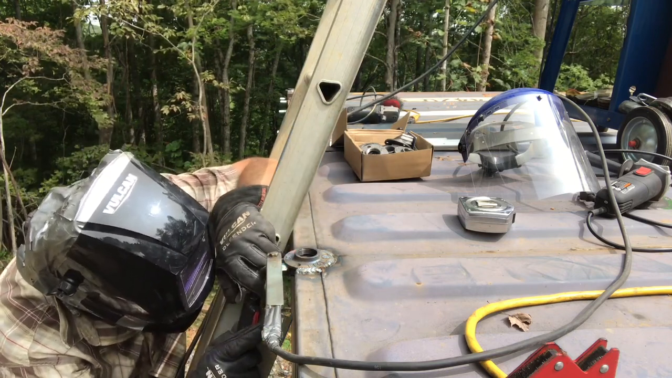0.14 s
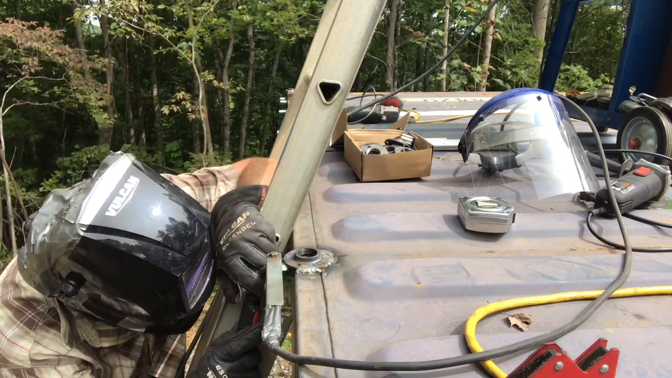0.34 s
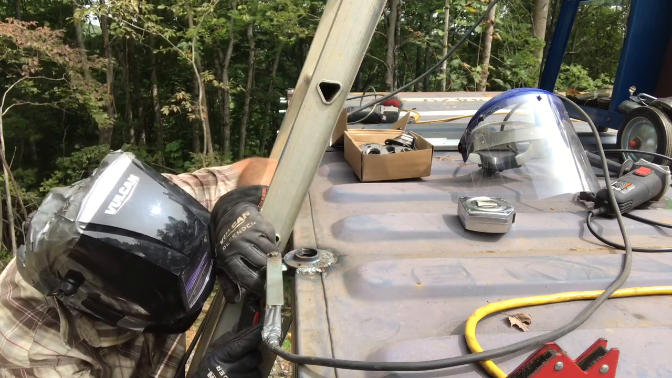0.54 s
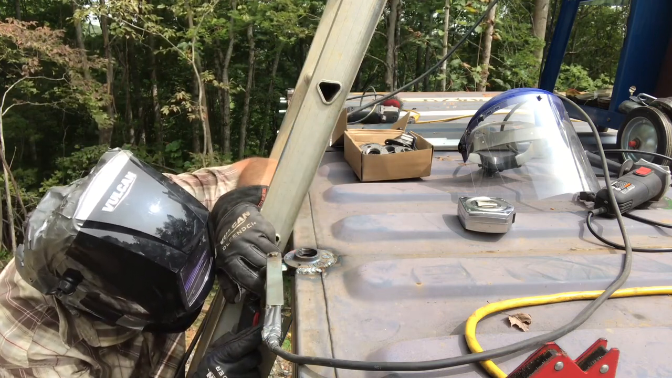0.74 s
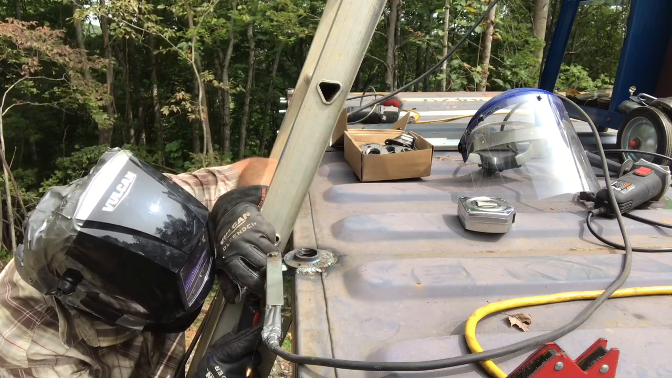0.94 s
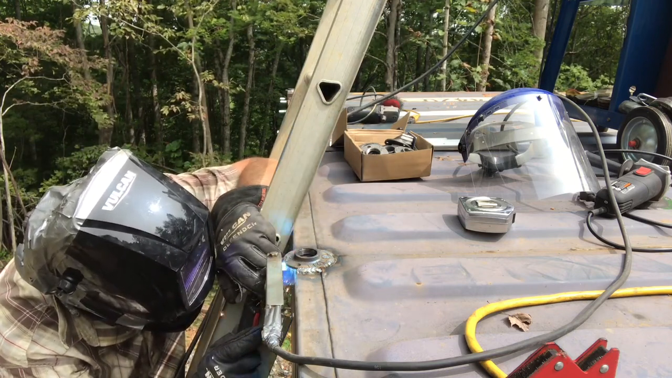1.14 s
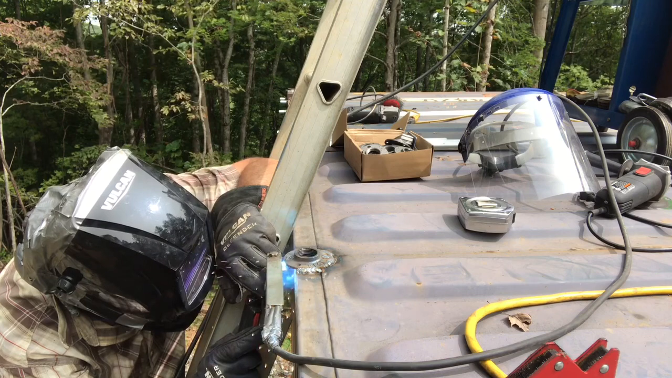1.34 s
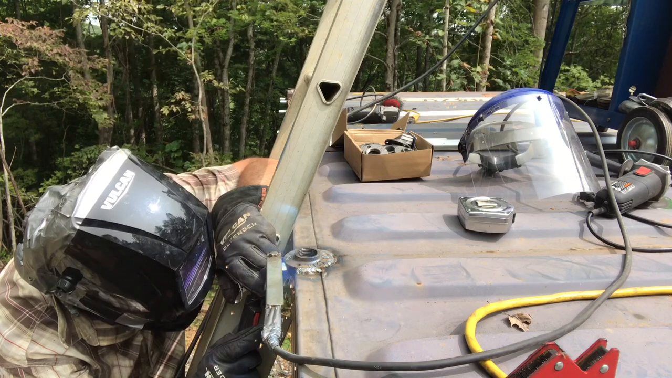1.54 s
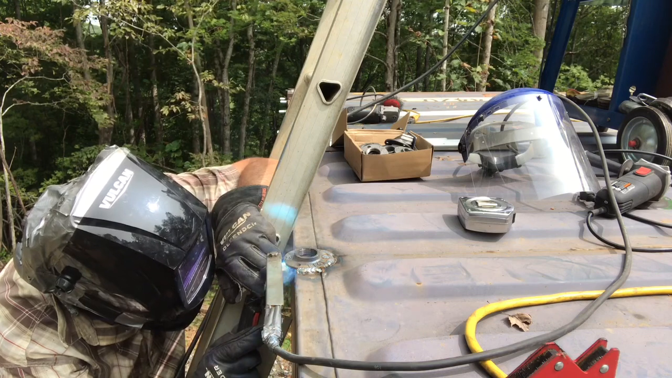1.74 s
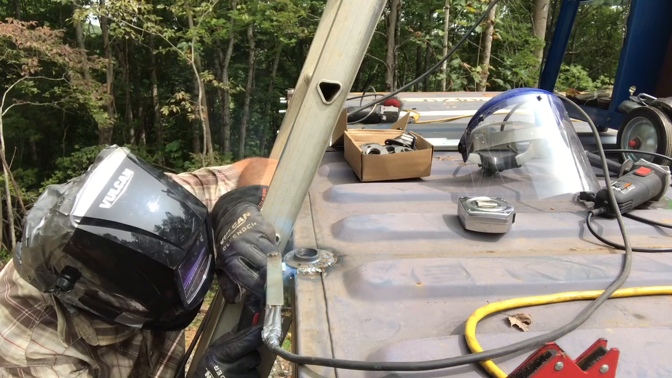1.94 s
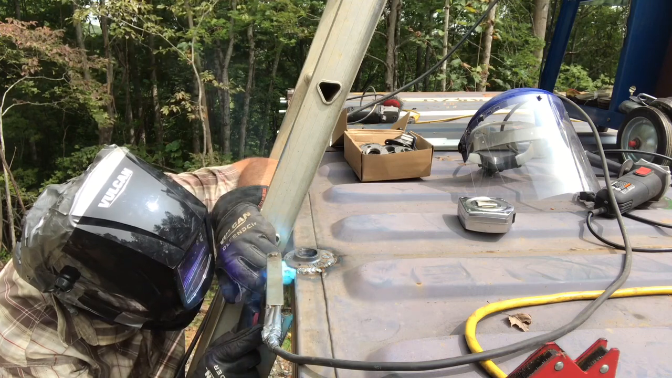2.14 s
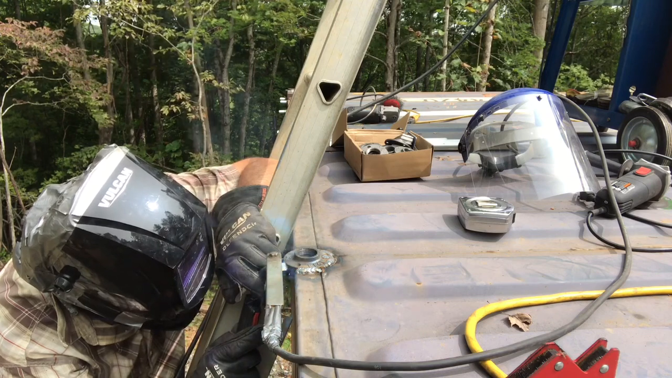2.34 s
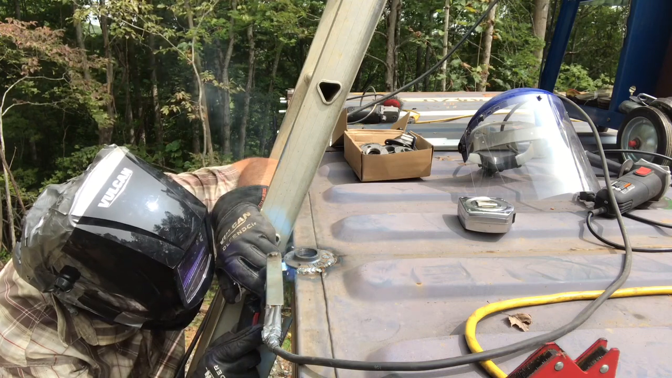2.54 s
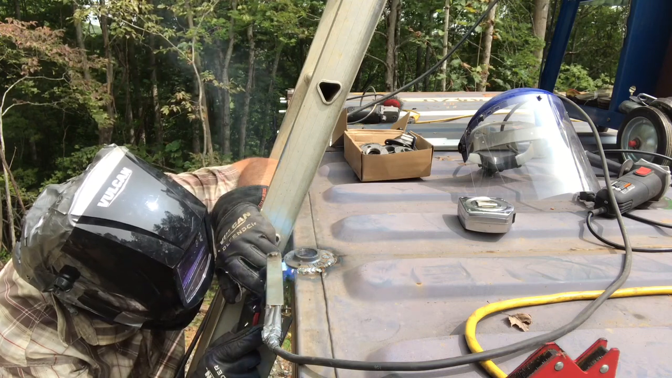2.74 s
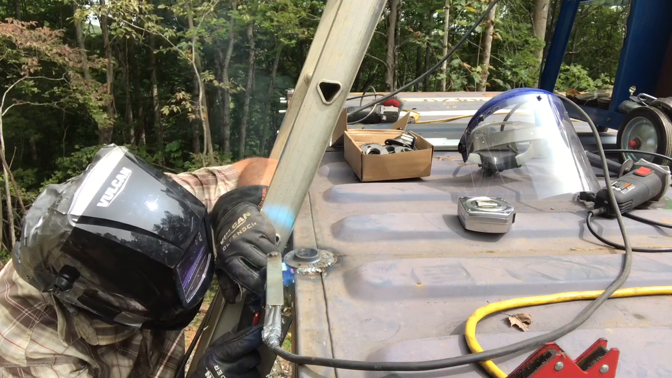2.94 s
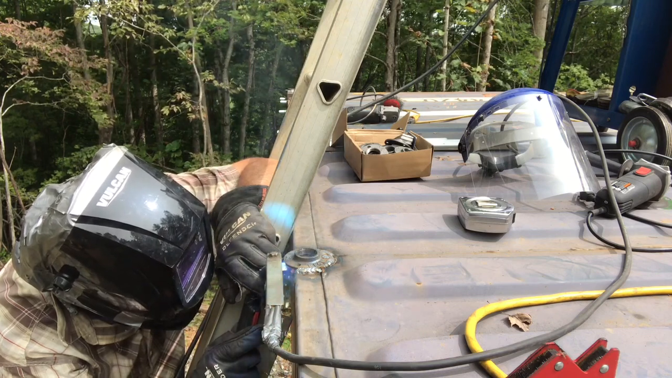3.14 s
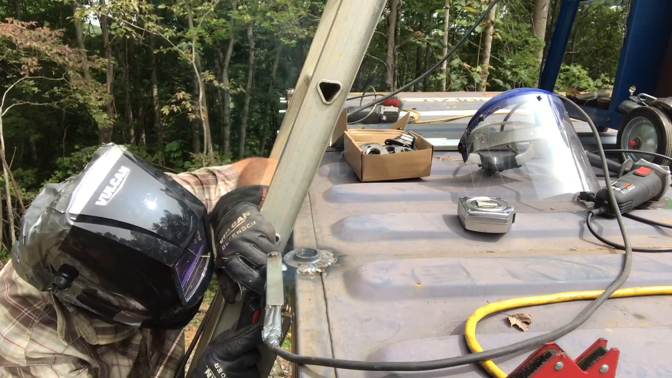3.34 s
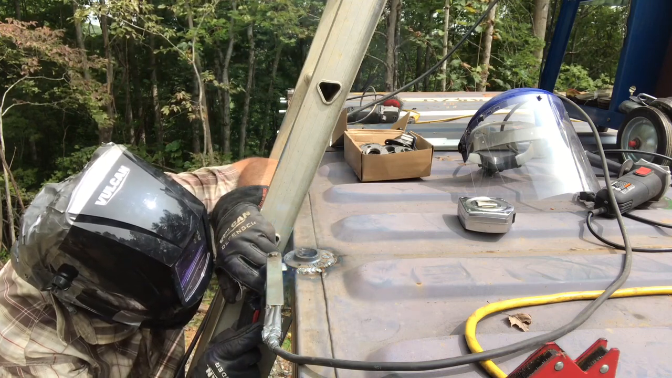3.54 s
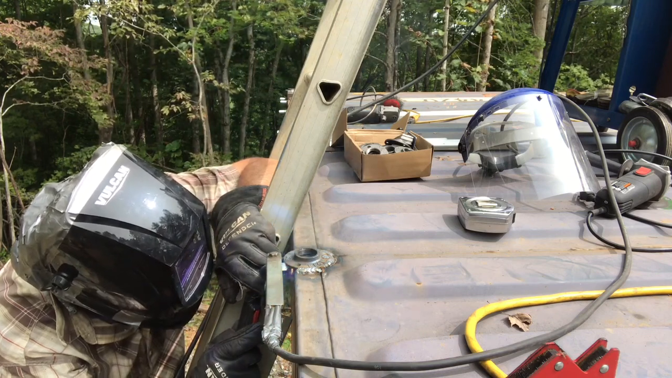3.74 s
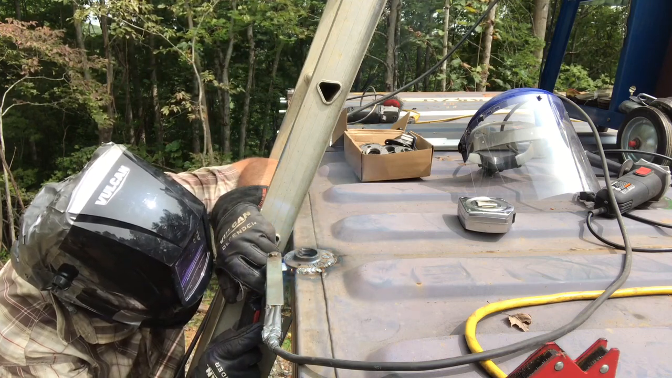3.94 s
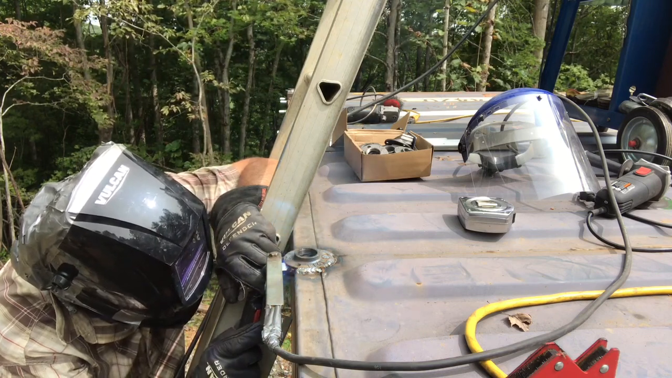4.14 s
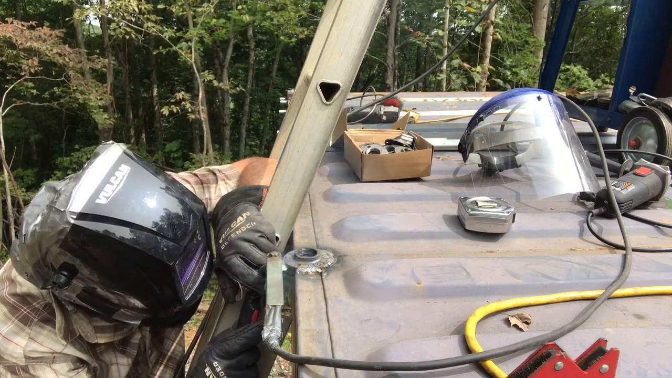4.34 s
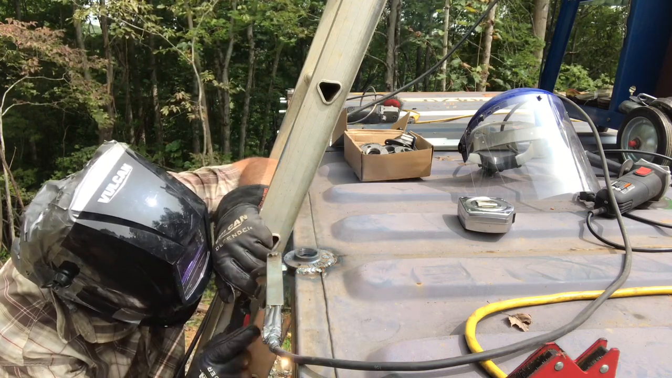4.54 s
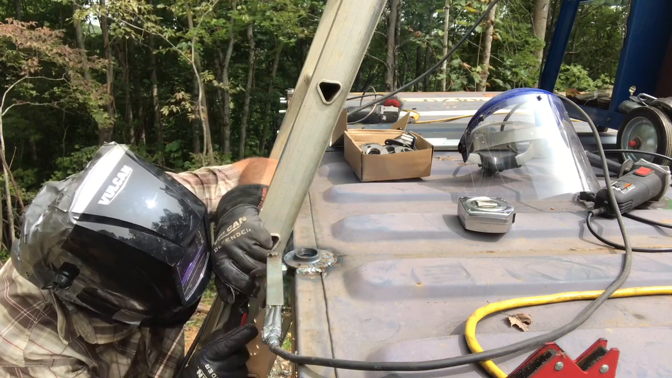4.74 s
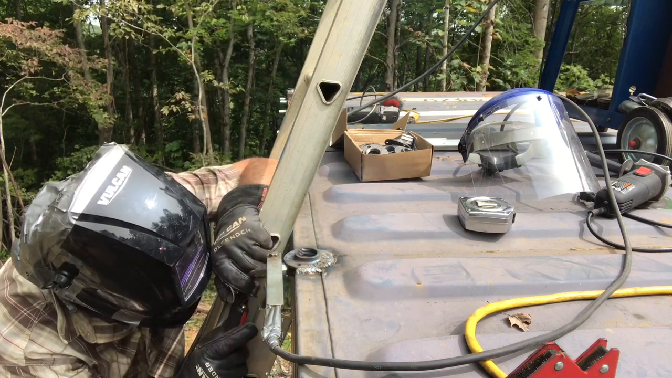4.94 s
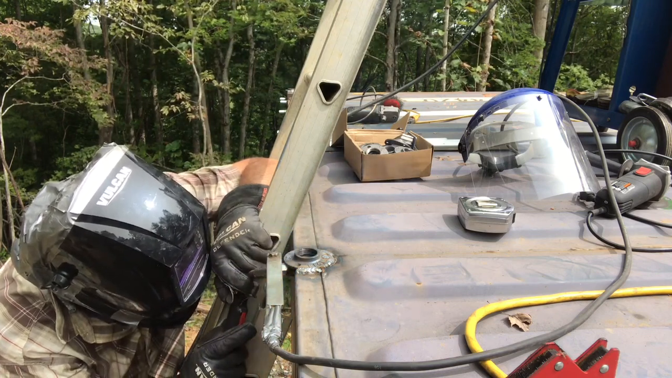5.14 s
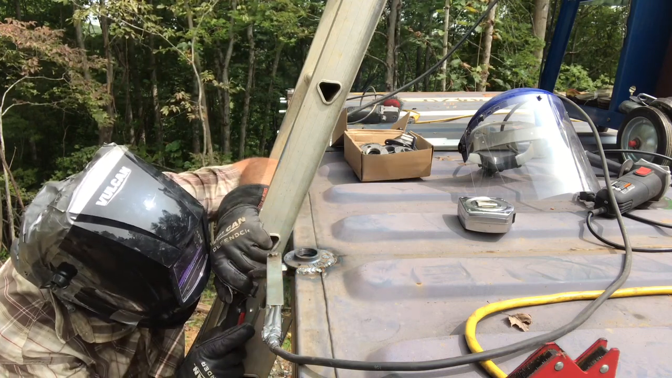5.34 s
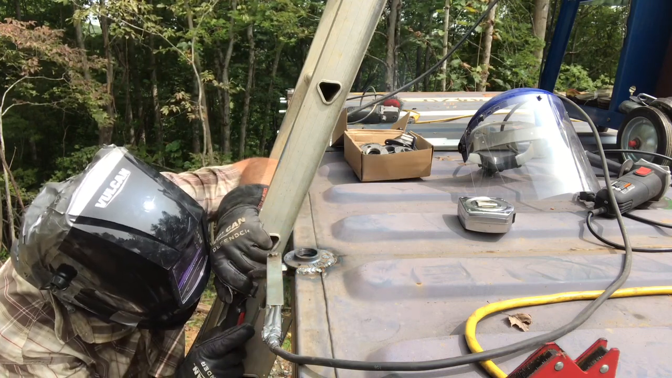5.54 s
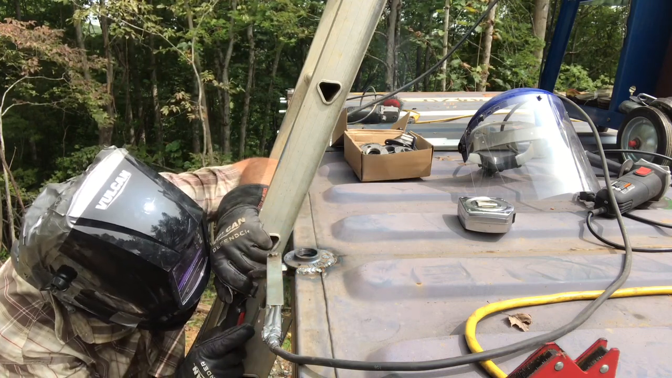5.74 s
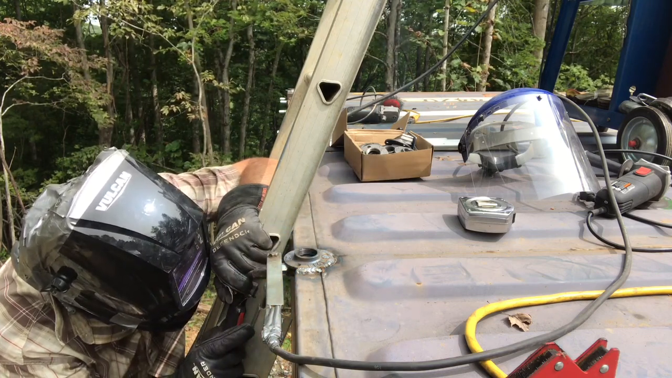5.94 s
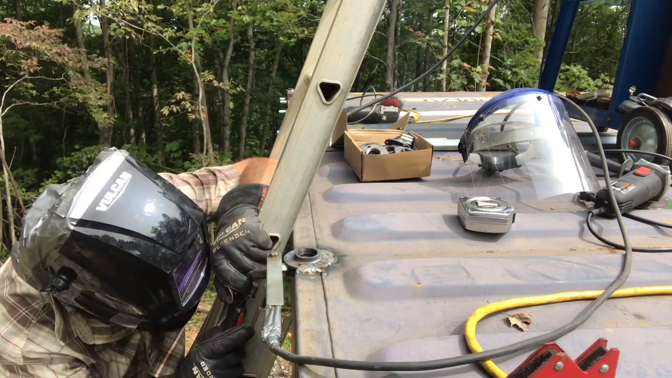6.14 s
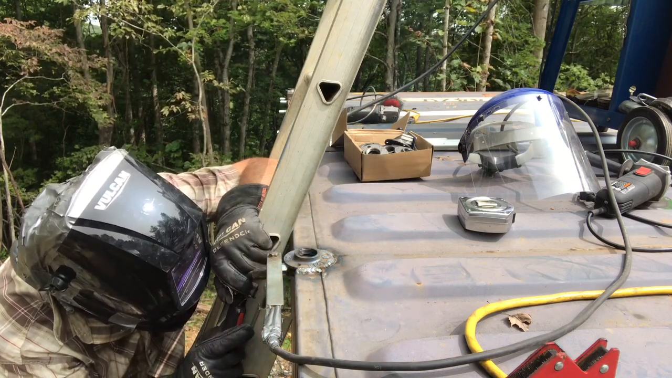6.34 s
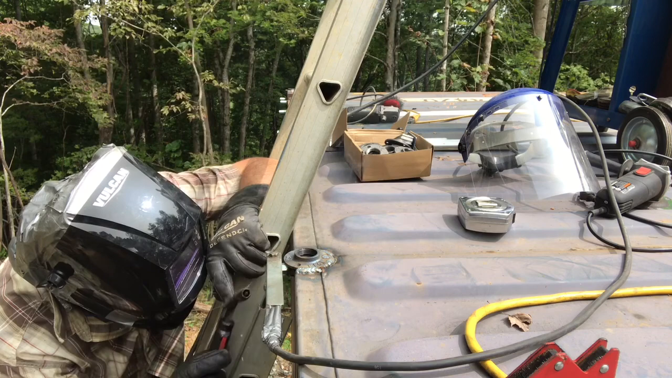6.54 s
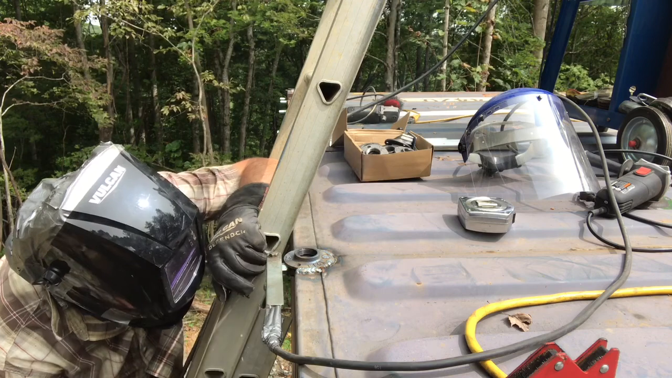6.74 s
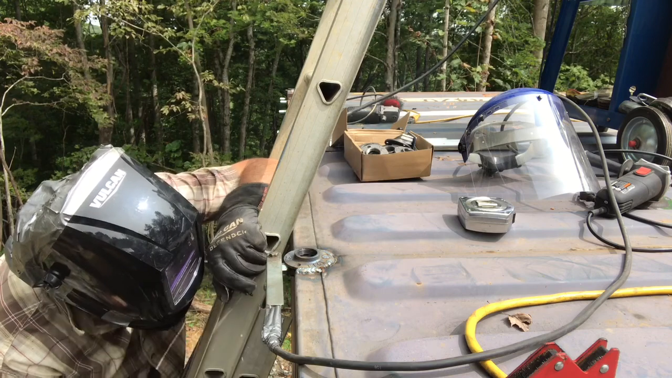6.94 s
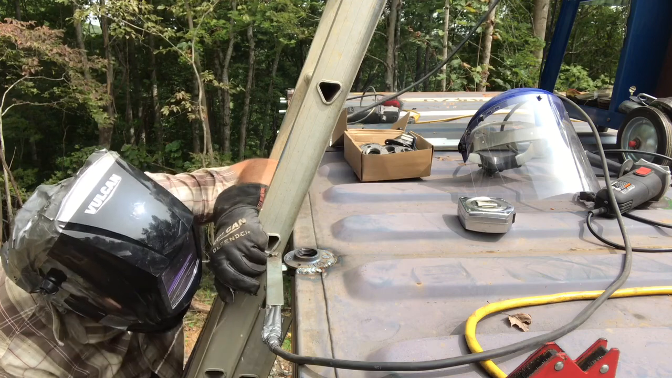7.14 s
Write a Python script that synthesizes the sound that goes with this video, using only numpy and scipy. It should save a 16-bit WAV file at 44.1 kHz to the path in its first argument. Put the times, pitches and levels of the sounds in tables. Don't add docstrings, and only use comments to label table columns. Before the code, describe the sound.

Close, dry welding crackle outdoors: clusters of hard bright pops ring on steel, with thin hiss and sputter between them, over a generator's steady drone further back. The bursts come between about one and three and a half seconds, gas hissing on a little longer. Afterwards there is mostly drone and whirr, broken by torch knocks and a faint sleeve rustle. The image is narrow and central.

```python
import sys
import numpy as np
from scipy import signal
from scipy.io import wavfile

SR = 44100
rng = np.random.default_rng(int(sys.argv[2]) if len(sys.argv) > 2 else 0)


def volts_from_db(level):
    exponent = np.asarray(level, float) / 20
    return 10 ** exponent


def wav_record(signal):
    frames = np.transpose(np.atleast_2d(signal))
    bounded = np.clip(frames, -1, 1)
    quanta = np.round(bounded * 32767).astype(np.int16)
    wavfile.write(sys.argv[1], SR, quanta)


N = 321924

# first pop in seconds, last pop in seconds, number of pops, gap ratio.
DRIP_RUNS = [(1.0772, 1.1012, 4, .95), (1.1179, 1.177, 6, 1.03), (1.2062, 1.2545, 4, 1),
             (1.294, 1.3531, 4, .95), (1.3772, 1.5054, 8, 1.01), (1.5265, 1.5861, 4, .95),
             (2.1806, 2.241, 6, 1.03), (2.2635, 2.3675, 6, 1.07), (2.67, 2.799, 7, 1.16),
             (2.829, 2.9452, 5, 1), (3.0037, 3.06, 3, 1.09), (3.1105, 3.3151, 8, .99)]
# level in dB, brightness in dB.
RUN_ARC = [(-13, 6.5), (-11, 0.5), (-8.5, -2.5), (-11.5, 2), (-11, -2), (-10, -2.5), (-14.5, 8), (-17, 15),
           (-10.5, -1), (-11, -7.5), (-10, -3), (-10, -2)]
# time in seconds, level in dB, brightness in dB.
STRAY_POPS = [(0.8512, -12.5, 0), (0.979, -7.5, -6), (1.3644, -20.5, 7), (1.5529, -22, -9), (1.7551, -5, 3),
              (1.761, -16.5, 0), (1.7708, -24.5, 12), (1.805, -25, -3), (1.8216, -17.5, 17),
              (1.834, -15, 16.5), (1.8487, -39, 15), (2.0196, -28.5, -4), (2.1132, -21, 5),
              (2.1238, -10.5, -3), (2.384, -29, 17), (2.423, -12.5, 9), (2.4449, -11.5, 1.5),
              (2.4536, -14, 9), (2.4839, -17, 15), (2.489, -15.5, 15), (2.5166, -18, 17.5),
              (2.5237, -18, 13), (2.6363, -14, 12), (2.9691, -11.5, -12.5), (2.979, -11.5, 1),
              (3.0837, -10.5, -7), (3.2111, -11.5, -10), (3.2514, -33, 10), (3.3067, -20, -6),
              (3.496, -18, 14)]
POP_SPREAD_DB, BRIGHT_SPREAD_DB = 1.2, 3.0
POP_SIDE_DB, POP_SIDE_HZ = -40, 4300
CLOSE_FACES = [(.27, .86), (1.02, -.5)]
OPEN_AFTER_MS, ESCAPE_DB = 2.6, -12
# centre in Hz, width in Hz, gain in dB.
STEEL_CORNER = [(2350, 600, 3), (3050, 450, -16), (4000, 200, -10), (4350, 250, -8), (3450, 400, -4),
                (4800, 650, 7), (5800, 450, 10), (6450, 380, -14), (7080, 200, -11), (7420, 350, 8),
                (8000, 300, 2), (8270, 250, -12), (9500, 800, -8), (10500, 450, -14), (10900, 300, 4),
                (11200, 200, -12), (11550, 500, 6), (11950, 450, -15), (12800, 250, -6), (13300, 250, -10),
                (13780, 250, -16), (14050, 300, 4), (14370, 200, -10), (14700, 500, 4), (15400, 250, -5)]
# delay in ms, level in dB, treble cut in Hz.
ECHOES = [(4.1, -19, 2700), (7.0, -25.5, 19000), (16.6, -31, 21000)]
# centre in Hz, width in Hz, gain in dB.
HOLLOW_BEAM = [(606, 89, 9.5), (787, 223, -15.5), (1258, 135, -32), (1606, 504, 10), (1966, 520, -56)]

# on in seconds, off in seconds, first level in dB, last level in dB.
VALVE = [
    (.645, 2.0, -51.5, -53),
    (2.02, 4.378, -62, -48.5),
]
# on in seconds, off in seconds, first level in dB, last level in dB.
BURNS = [
    (1.048, 1.6, -43, -65),
    (1.71, 1.89, -42, -47),
    (2.021, 2.124, -43, -46),
    (2.166, 2.398, -29, -47),
    (2.385, 3.32, -43, -43),
    (3.67, 3.85, -51, -55),
]
HISS_RISE_S, HISS_FALL_S = 0.015, 0.04
# frequency in Hz, level in dB per Hz.
GAS_COLOUR = [(1500, -32), (3000, 0), (5800, -0.5), (7500, -3), (10000, -6), (13000, -5), (16000, -5)]
# centre in Hz, width in Hz, gain in dB.
NOZZLE = [(5850, 450, 11), (6800, 350, 7), (8600, 400, 5), (9900, 400, 9), (11500, 400, 8), (14200, 600, 8),
          (15200, 400, 6)]
# on in seconds, off in seconds, first level in dB, last level in dB.
SPUTTERS = [(.86, .9, -56, -52), (1.01, 1.02, -48, -46), (1.045, 1.075, -44, -44), (1.718, 1.75, -33, -50),
            (1.875, 1.89, -42, -44.5), (2.025, 2.075, -42, -42), (2.11, 2.14, -36, -39),
            (2.165, 2.4, -40, -50), (2.54, 2.62, -44, -49), (3.68, 3.72, -50, -50),
            (4.222, 4.252, -33, -32.5)]
SPUTTER_RISE_S, SPUTTER_FALL_S = 0.011, 0.031

# time in seconds, peak in dB, pitch in Hz, t60 in seconds, tick level in dB, tick low cut in Hz.
KNOCKS = [
    (.627, -55, 2000, .025, -34, 6500),
    (4.645, -36, 560, .05, -21, 450),
    (4.645, -38, 1500, .03, -44, 8000),
    (5.0, -60, 900, .02, -46, 6000),
    (5.8, -60, 2000, .02, -42, 5000),
    (6.772, -36, 430, .06, -70, 5000),
]
# time in seconds, level in dB.
RUSTLE = [
    (6.5, -85),
    (6.54, -59),
    (6.8, -59),
    (6.95, -72),
    (7.0, -85),
]

# time in seconds, turns per second in Hz, effort in dB.
ENGINE = [(0, 31.58, 1), (.75, 31.76, 1), (1, 30.96, 0.5), (1.63, 30.92, 0), (1.95, 31.54, -1),
          (2.34, 31.27, -1), (2.6, 31, -0.5), (3.3, 31.43, -0.5), (3.6, 31.1, 2), (4.2, 31.4, 2),
          (4.65, 32.05, 1), (5.5, 31.55, 1.5), (7.3, 31.72, 1.5)]
# multiple of the turning speed, level in dB.
EXHAUST_ORDERS = [(1, -66), (2, -39.5), (3, -56.5), (4, -50), (5, -60), (7, -48.5), (10, -60), (11, -60.5),
                  (17, -59), (21, -64), (22, -63), (25, -72.5), (34, -64), (40, -61.5), (48, -61.5),
                  (68, -63)]
# pitch in Hz, level in dB, on in seconds, off in seconds.
MOTOR_TONES = [
    (49.3, -51, -1, .62),
    (98.4, -54, -1, .62),
    (73.5, -48, .62, 5.45),
    (49.3, -49, 5.5, 8),
    (98.4, -53, 5.5, 8),
]
# time in seconds, level in dB.
THUDS = [(.1, -57), (1.3, -56), (2.55, -74), (3.75, -57), (4.98, -49.5), (6.2, -66)]
RUMBLE_DB = -53
# frequency in Hz, level in dB per Hz.
WHIRR_COLOUR = [(140, -36.5), (230, 1.5), (270, -10.5), (328, -8.5), (485, -22.5), (539, -13.5),
                (755, -14.5), (1540, -13), (1650, -17), (3130, -17.5), (6360, -27.5), (14100, -49.5),
                (16000, -38.5)]
WHIRR_DB = -44
# frequency in Hz, side level under mid in dB.
WIDTH = [(60, -25), (200, -17.5), (700, -10.5), (1300, -25.5), (2400, -32.5), (15000, -42.5)]


def arc_pops():
    s, level_db, bright_db = pop_events()
    dull = cut(clicks(s, volts_from_db(level_db - .5 * bright_db)), 4020, "low", order=1)
    bright = cut(clicks(s, volts_from_db(level_db + .5 * bright_db + 2.5)), 2500, "high", order=1)
    burst = dying(clicks(s, volts_from_db(level_db - 16)), .0015)
    after = burst + dying(clicks(s, volts_from_db(level_db - 31.5)), 0.017)
    before = dying(clicks(s, volts_from_db(level_db - 25.5))[::-1], 0.006)[::-1]
    spatter = cut(rng.standard_normal(N) * (before + after), 3800, "high", order=1)
    bang = dull + bright + spatter
    heard = volts_from_db(17) * signal.oaconvolve(bang, surroundings())[:N]
    askew = volts_from_db(POP_SIDE_DB) * cut(heard, POP_SIDE_HZ, "low", order=6) * [[1], [-1]]
    return heard + askew


def pop_events():
    rows = []
    for (first, last, number, ratio), arc in zip(DRIP_RUNS, RUN_ARC):
        steps = np.cumsum(ratio ** np.arange(number)) - 1
        rows += [(first + (last - first) * step / steps[-1], *arc) for step in steps]
    rows = np.array(rows)
    rows[:, 1:] += rng.standard_normal((len(rows), 2)) * [POP_SPREAD_DB, BRIGHT_SPREAD_DB]
    return np.vstack([rows, STRAY_POPS]).T


def surroundings():
    click = np.zeros(2400)
    click[0] = 1
    first = click
    for ms, back in CLOSE_FACES:
        loop = np.zeros(round(ms * SR / 1000) + 1)
        loop[0], loop[-1] = 1, back
        first = signal.lfilter(loop[::-1], loop, first)
    age_ms = np.arange(len(click)) * 1000 / SR
    first = steel_corner(first) * volts_from_db(ESCAPE_DB * np.clip(age_ms - OPEN_AFTER_MS, 0, 1))
    path = first.copy()
    for ms, db, hz in ECHOES:
        path += volts_from_db(db) * cut(np.roll(first, round(ms * SR / 1000)), hz, "low", order=1)
    tail = volts_from_db(-23.5) * dying(click, 0.019) + volts_from_db(-50.0) * dying(click, 0.22)
    scatter = rng.standard_normal(len(click)) * tail
    path += steel_corner(cut(scatter, 2100, "high", order=1))
    return resonances(HOLLOW_BEAM, cut(path, 500, "high"))


def steel_corner(x):
    return resonances(STEEL_CORNER, x + 1e-18)


def gas():
    flow = hiss_level(VALVE + BURNS, HISS_RISE_S, HISS_FALL_S) * volts_from_db(1.0 * drift(24.82))
    jet = rms_one(resonances(NOZZLE, banded_noise(GAS_COLOUR, patchy_db=-1.9)))
    spurt = rms_one(cut(steel_corner(rng.standard_normal(N)), 11000, "high", order=1))
    flutter_db = 3.0 * drift(120)
    sputter = hiss_level(SPUTTERS, SPUTTER_RISE_S, SPUTTER_FALL_S) * volts_from_db(flutter_db) * spurt
    return flow * jet + sputter


def hiss_level(spells, rise_s, fall_s):
    t = np.arange(N) / SR
    power = 0
    for on, off, first_db, last_db in spells:
        corners_s = [on - rise_s, on, off, off + fall_s]
        level_db = np.interp(t, corners_s, [-80, first_db, last_db, -80], -200, -200)
        power = power + volts_from_db(2 * level_db)
    return np.sqrt(power)


def knocks():
    brush_db = in_time(RUSTLE)[0] + 1.47 * drift(30)
    out = volts_from_db(brush_db) * rms_one(cut(rng.standard_normal(N), 6700, "high"))
    t = np.arange(4000) / SR
    for s, peak_db, hz, t60, tick_db, tick_hz in KNOCKS:
        envelope = volts_from_db(-60 * t / t60)
        ring = envelope * np.sin(2 * np.pi * hz * t)
        tick = cut(cut(rng.standard_normal(len(t)), tick_hz, "high"), 4 * tick_hz, "low")
        at = round(s * SR)
        out[at:at + len(t)] += volts_from_db(peak_db) * ring + volts_from_db(tick_db) * envelope ** 2 * tick
    return out


def generator():
    turns_hz, effort_db = in_time(ENGINE)
    angle = 2 * np.pi * np.cumsum(turns_hz + 0.041 * drift(2.7)) / SR
    out = np.zeros(N)
    for k, db in EXHAUST_ORDERS:
        waver_db = (0.21 + 0.32 * np.log(k)) * drift(6.4)
        tone = np.sin(k * angle + rng.uniform(0, 2 * np.pi))
        out += np.sqrt(2) * volts_from_db(db + effort_db + waver_db) * tone
    return out


def motor():
    t = np.arange(N) / SR
    tones = np.zeros(N)
    for hz, db, on, off in MOTOR_TONES:
        fade = np.clip(np.minimum(t - on, off - t) / .06, 0, 1)
        tones += np.sqrt(2) * volts_from_db(db) * fade * np.sin(2 * np.pi * hz * t)
    swell = volts_from_db(RUMBLE_DB) + sum(volts_from_db(db) * np.exp(-((t - s) / 0.048) ** 2) for s, db in THUDS)
    mid, side = cut(rng.standard_normal((2, N)), [40, 230], "band")
    rumble = (swell * mid + volts_from_db(-61.5) * side * [[1], [-1]]) / np.std(mid)
    return tones + rumble


def machine_whirr():
    return volts_from_db(WHIRR_DB) * banded_noise(WHIRR_COLOUR, patchy_db=1.0)


def banded_noise(spectrum, patchy_db):
    out, edges = 0, 160 * 2 ** np.arange(0, 7.1, .5)
    white = rng.standard_normal((2, 2, N))
    for k, (low, high) in enumerate(zip(edges, edges[1:])):
        mid, side = cut(white[k % 2], [low, high], "band")
        hz = np.sqrt(low * high)
        side = side * volts_from_db(at_hz(WIDTH, hz)) * [[1], [-1]]
        out = out + volts_from_db(at_hz(spectrum, hz) + patchy_db * drift(19.0)) * (mid + side)
    return rms_one(out)


def resonances(rows, x):
    return signal.sosfilt([resonance(*row) for row in rows], x)


def resonance(hz, width_hz, db):
    w, half = 2 * np.pi * hz / SR, np.pi * width_hz / SR
    top = half * volts_from_db(db)
    return np.array([1 + top, -2 * np.cos(w), 1 - top, 1 + half, -2 * np.cos(w), 1 - half]) / (1 + half)


def clicks(times, gains):
    out = np.zeros(N)
    np.add.at(out, np.round(np.asarray(times) * SR).astype(int), gains)
    return out


def dying(x, t60):
    return signal.lfilter([1], [1, -volts_from_db(-60 / (t60 * SR))], x)


def drift(rate):
    r = np.exp(-80 * np.pi * rate / SR)
    slow = signal.lfilter([1], [1, -2 * r, r * r], rng.standard_normal(N // 40 + 2002))[2000:]
    return np.interp(np.arange(N) / 40, np.arange(len(slow)), rms_one(slow))


def cut(x, hz, kind, order=2):
    sos = signal.butter(order, np.clip(hz, 10, .45 * SR), kind, fs=SR, output="sos")
    return signal.sosfilt(sos, x)


def in_time(rows):
    s, *columns = np.transpose(rows)
    return [np.interp(np.arange(N) / SR, s, c) for c in columns]


def at_hz(points, hz):
    points_hz, db = np.transpose(points)
    return np.interp(np.log(hz), np.log(points_hz), db)


def rms_one(x):
    return x / np.sqrt(np.mean(x ** 2) + 1e-20)


def scene():
    whirr = machine_whirr()
    return arc_pops() + gas() + knocks() + generator() + motor() + whirr


def band_limit(x):
    return signal.sosfilt(signal.butter(12, 16820, fs=SR, output="sos"), x)


def record(dry):
    rounded = .9 * np.tanh(dry / .9)
    steep = signal.cheby2(12, 40, 16100, fs=SR, output="sos")
    return band_limit(signal.sosfilt(steep, rounded))


dry = scene()
out = record(dry)
wav_record(out)
```